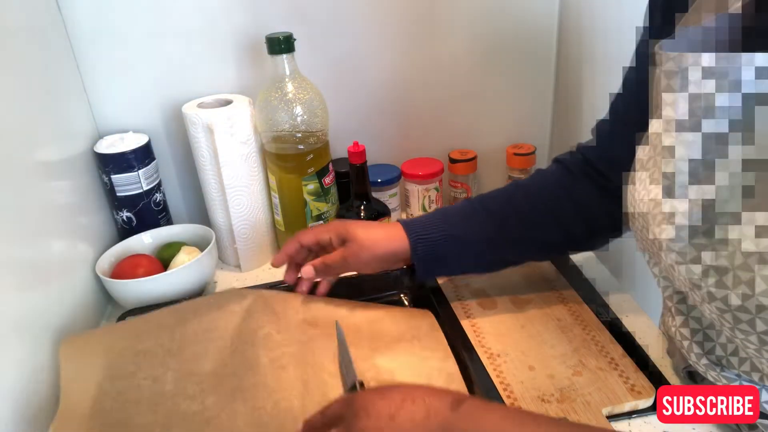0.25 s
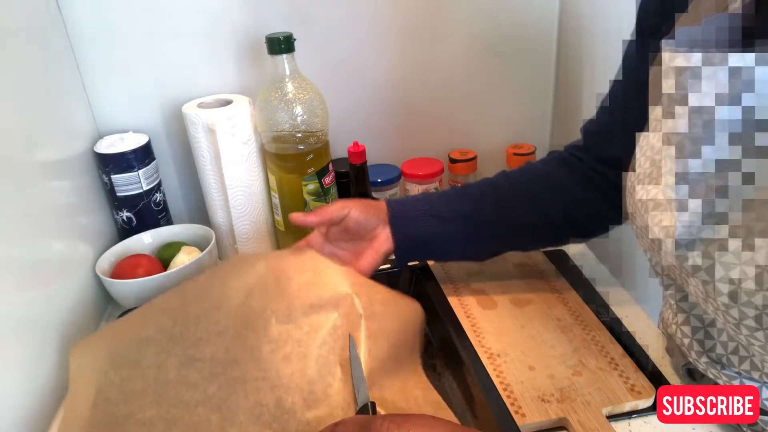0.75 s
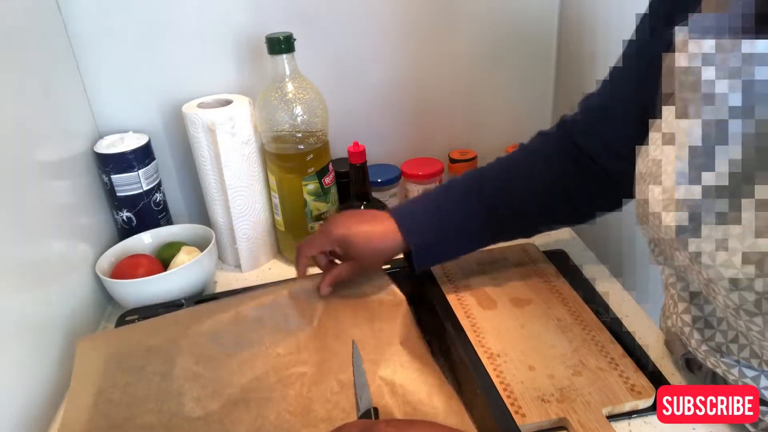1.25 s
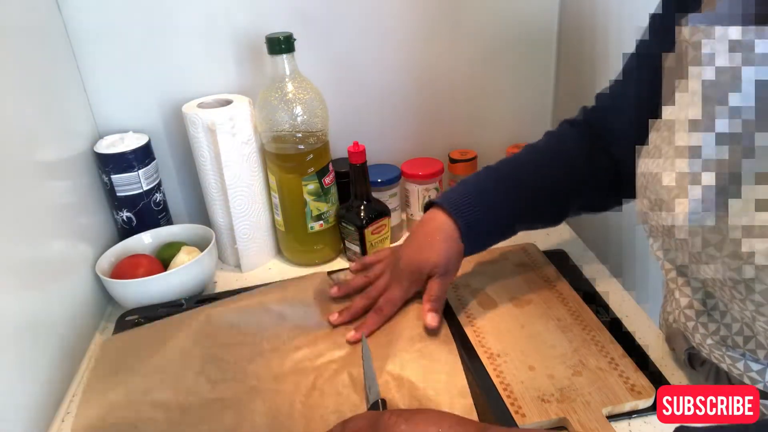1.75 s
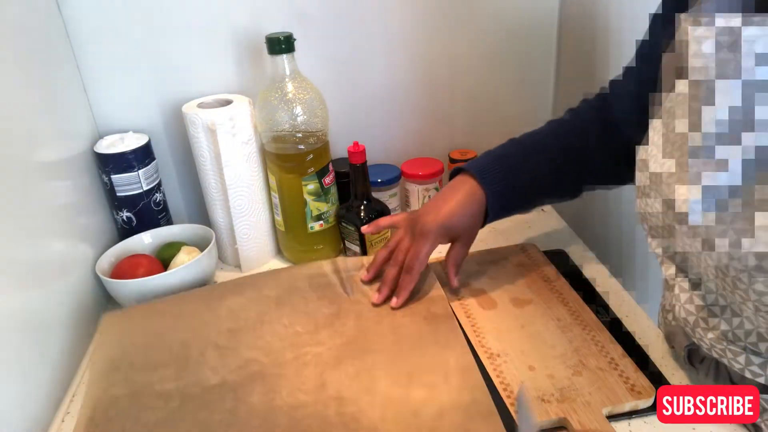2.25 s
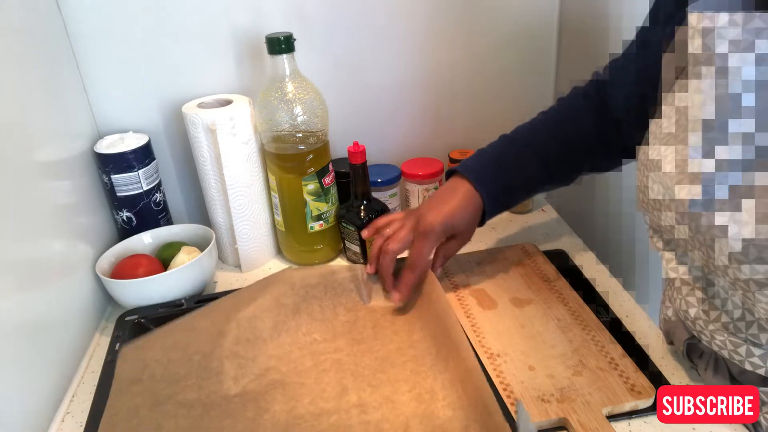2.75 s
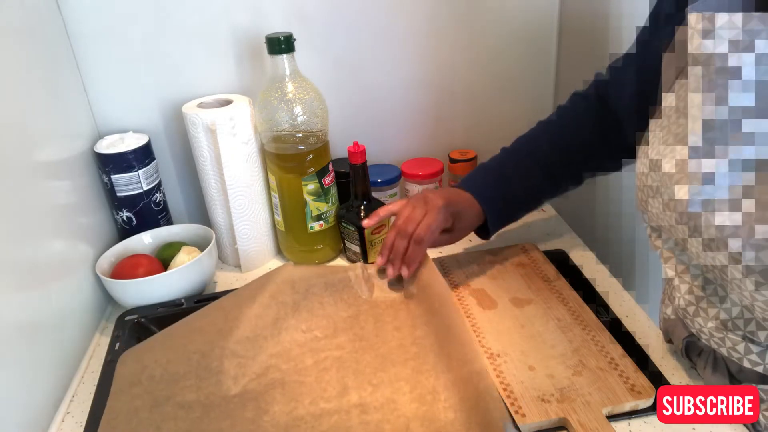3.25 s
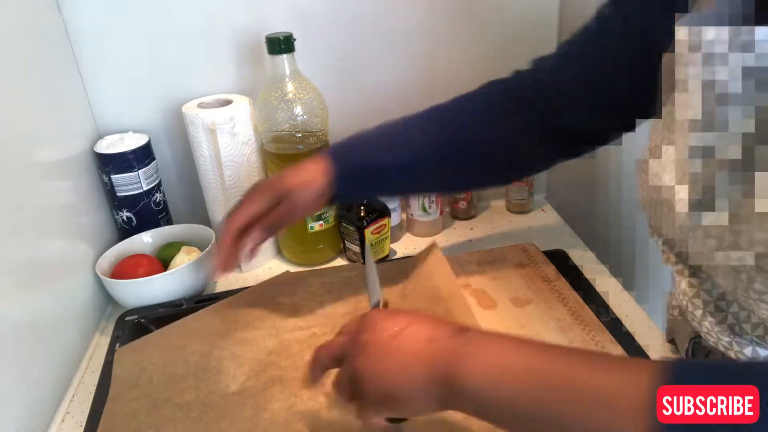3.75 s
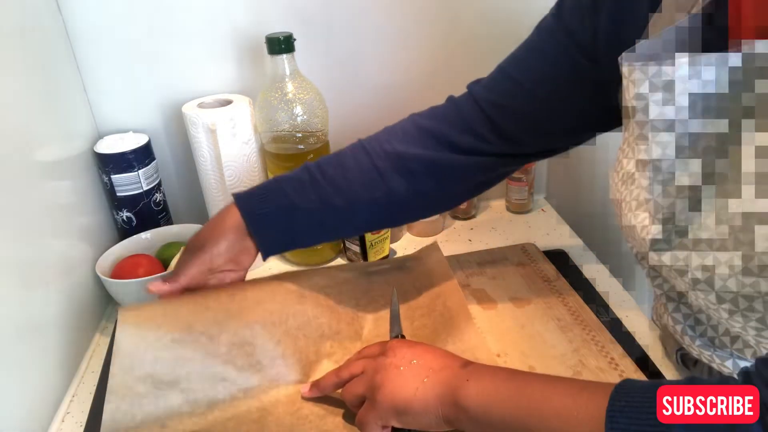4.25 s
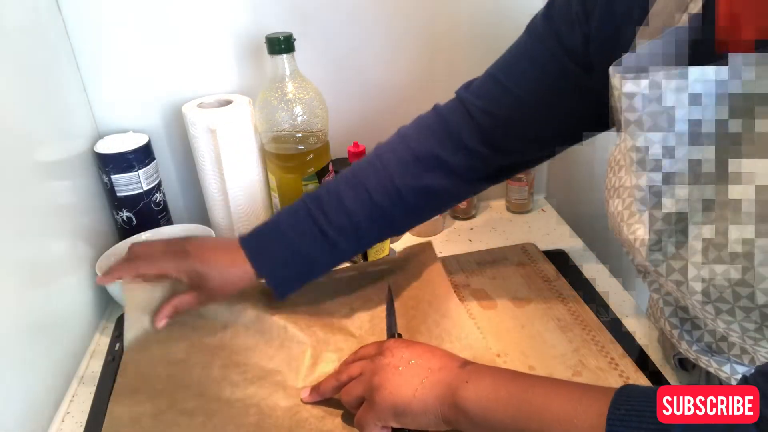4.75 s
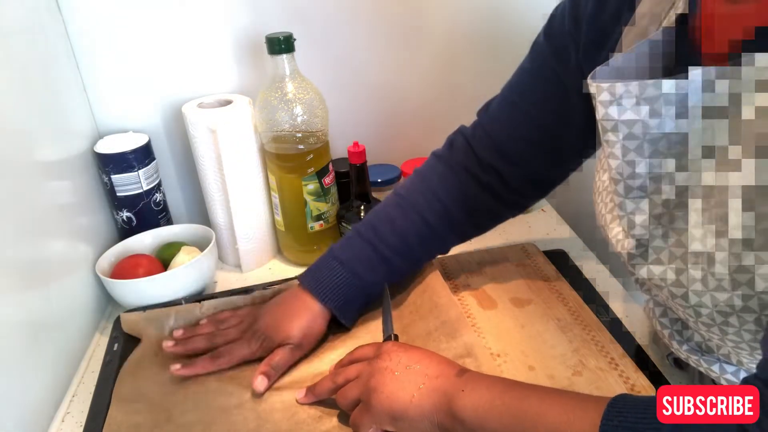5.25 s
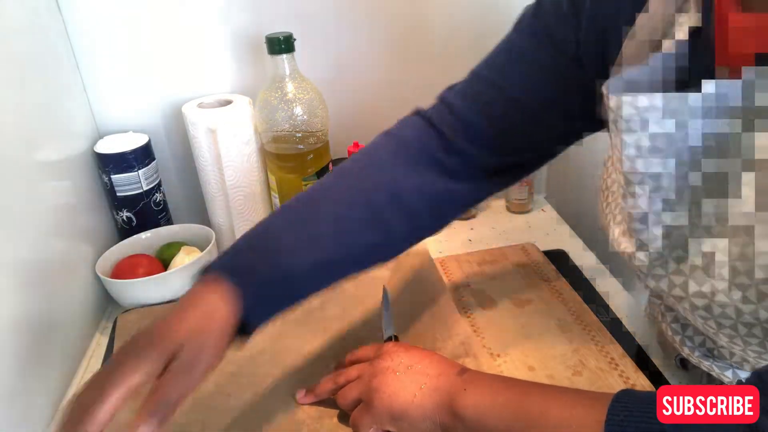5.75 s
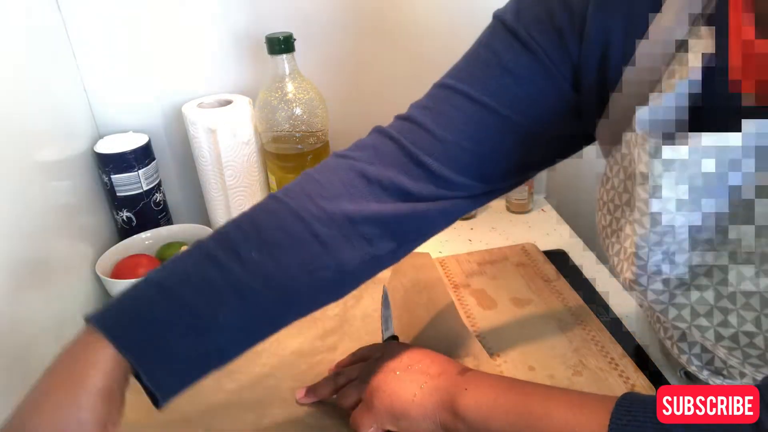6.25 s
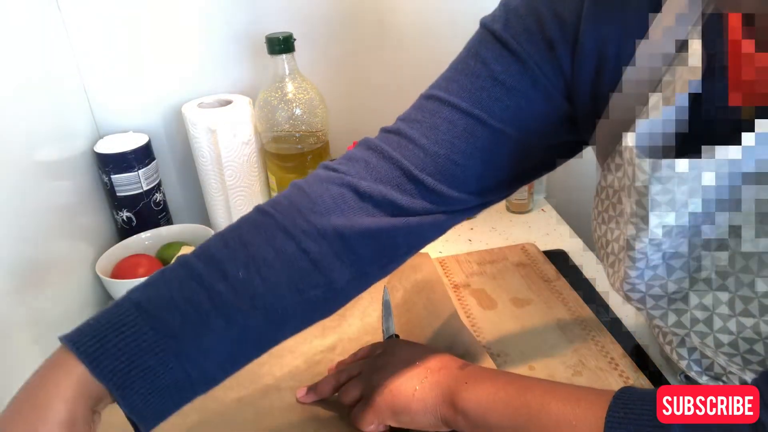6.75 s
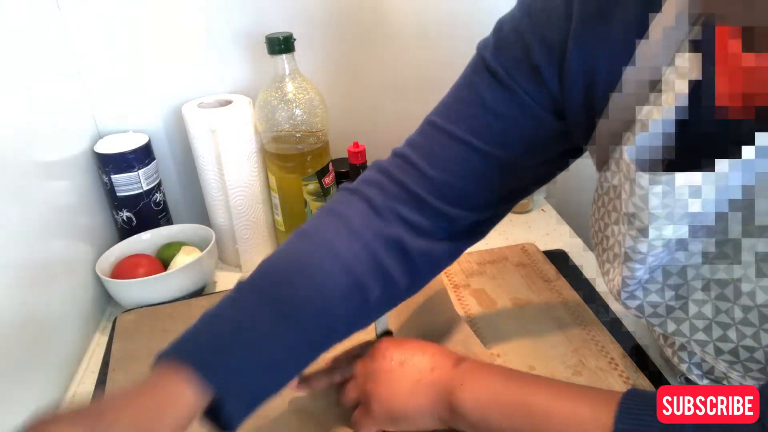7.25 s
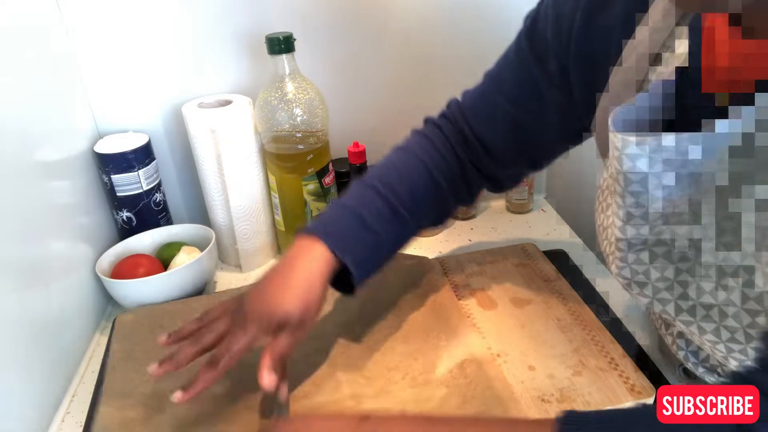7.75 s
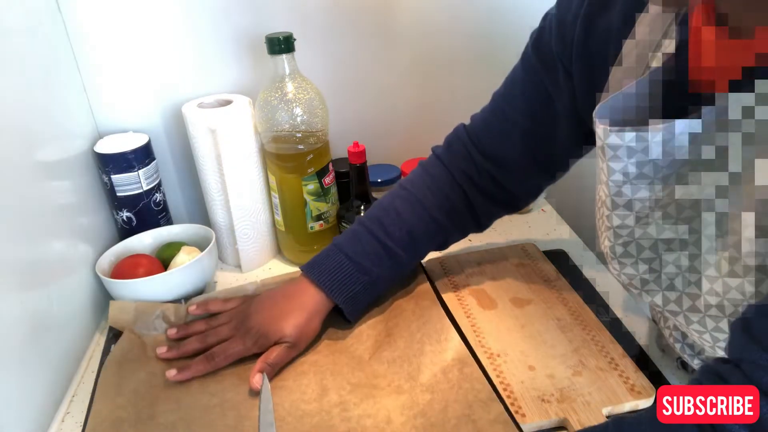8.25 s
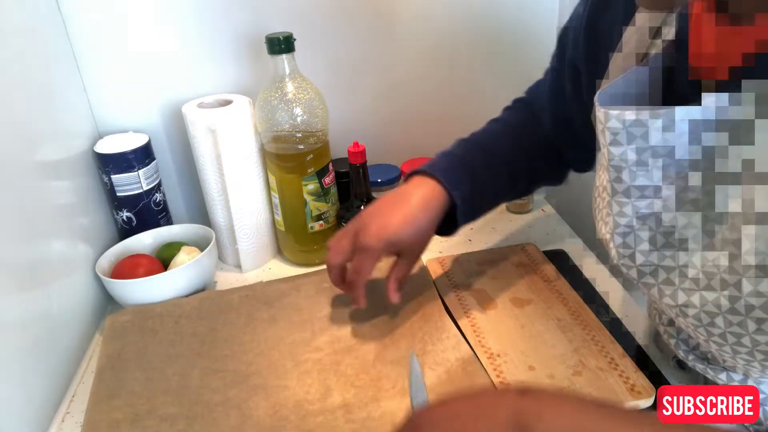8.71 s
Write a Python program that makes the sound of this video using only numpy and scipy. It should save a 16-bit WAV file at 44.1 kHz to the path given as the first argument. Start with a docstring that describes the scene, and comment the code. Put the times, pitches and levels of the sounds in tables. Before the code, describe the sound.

Baking paper crinkles and rustles in uneven bursts as hands spread and smooth it over a metal tray, with sharp creases snapping in a small kitchen.

```python
"""Rustling baking paper, spread and smoothed by hand over a metal tray in the corner of a small kitchen.
Sliding is random facet clicks plus friction noise, shaped stroke by stroke; creases snap as single
swelling ticks or collapse in quick runs of clicks. Now and then the palm pats the tray: decaying modes
boom softly under a puff of air. Some drags add a hollow gliding note of resonant noise.
Wall echoes and a short tail surround the paper; faint room air lies under it all. One close microphone."""
import sys
import numpy as np
from scipy import signal
from scipy.fft import rfft, irfft
from scipy.io import wavfile

SR = 44100
rng = np.random.default_rng(int(sys.argv[2]) if len(sys.argv) > 2 else 0)


def transcribe(u):
    """Save the signal u as a 16-bit wav file named by the first command-line argument.

    u: samples, shape (n,) or (channels, n), limited to [-1, 1]; the rate is SR.
    q: integer samples, one column per channel.
    """
    v = np.clip(np.atleast_2d(u).T, -1, 1)
    q = np.round(v * 32767).astype(np.int16)
    wavfile.write(sys.argv[1], SR, q)


N = 396018

# colour of the sheet: hz, density_db (relative, per Hz)
PAPER_COLOUR = [(35, -45.5), (65, -12), (130, -12), (220, -6), (340, -5.5), (480, -5), (800, -3.5),
                (1400, 0), (2600, 1), (4200, 0), (6000, -4.5), (7700, -7), (8400, -11.5), (16000, -23.5)]


def gain_of(db):
    """Decibels to an amplitude factor."""
    return 10 ** (np.asarray(db) / 20)


def evened(x):
    """Scales to rms 1."""
    return x / np.sqrt(np.mean(x ** 2) + 1e-20)


def read(points, hz):
    """Interpolates a table along a logarithmic frequency axis."""
    table_hz, value = np.transpose(points)
    return np.interp(np.log(hz + 1), np.log(table_hz + 1), value)


def add(mix, start_s, sound):
    """Mixes a sound in at start_s, cut at the end of the mix."""
    part = mix[max(round(start_s * SR), 0):][:len(sound)]
    part += sound[:len(part)]


def coloured(x, points, size=4096):
    """Causal minimum-phase filter with the given spectrum, so that clicks keep their sharp fronts."""
    hz = abs(np.fft.fftfreq(size, 1 / SR))
    log_gain = np.log(gain_of(read(points, hz)))
    taps = np.fft.ifft(np.exp(np.conj(signal.hilbert(log_gain)))).real
    # of the two time directions, keep the one with its energy up front
    both = taps, np.roll(taps[::-1], 1)
    taps = max(both, key=lambda h: np.sum(h[:size // 2] ** 2))[:size // 2]
    return signal.oaconvolve(x, taps / np.linalg.norm(taps))[:len(x)]


def tinted(x, crisp_db, body_db, treble_hz=6200, body_hz=1000):
    """Taut paper has more treble; paper pressed on the tray has more body."""
    hz = np.fft.rfftfreq(len(x), 1 / SR)
    spectrum = rfft(x)
    treble = irfft(spectrum * (1 - 1 / (1 + (hz / treble_hz) ** 4)), len(x))
    body = irfft(spectrum / (1 + (hz / body_hz) ** 4), len(x))
    return x + (gain_of(crisp_db) - 1) * treble + (gain_of(body_db) - 1) * body


def gliding(hz, width_hz):
    """Noise in a resonance that follows the curve hz."""
    noise = rng.standard_normal(len(hz)) + 1j * rng.standard_normal(len(hz))
    lowpass = signal.butter(2, width_hz / 2, fs=SR, output="sos")
    band = signal.sosfilt(lowpass, noise)
    carrier = np.exp(2j * np.pi * np.cumsum(hz) / SR)
    return evened((band * carrier).real)


def grip(length, uneven_db, slips_per_s):
    """Paper catches and lets go: a gain that wanders between slips at irregular moments."""
    slips_s = np.cumsum(rng.exponential(1 / slips_per_s, length))
    wander = np.interp(np.arange(length) / SR, slips_s, rng.uniform(-1.56, 1, length))
    return gain_of(uneven_db * wander)


def buckle(t60_s, crack=0.67, crack_s=0.00052, rise_s=0.00036, uneven_db=5.0, size=4096):
    """One facet flips: a crack, then bending waves scatter, coloured by the facet's own resonances."""
    t = np.arange(size) / SR
    decay = gain_of(-60 * t / t60_s) + crack * np.exp(-t / crack_s)
    shape = decay * (1 - np.exp(-t / rise_s))
    hz = np.geomspace(200, 16000, num=24)
    resonances = np.column_stack([hz, uneven_db * rng.uniform(-1.94, 1.82, len(hz))])
    wave = coloured(rng.standard_normal(size) * shape, resonances, size=1024)
    return wave / np.linalg.norm(wave)


def crackle(length, per_s, spread_db, t60_s, count=28):
    """Facets of count kinds flip at random, mostly small and a few large."""
    sizes = gain_of(spread_db * np.minimum(rng.exponential(1, length), 3.5))
    sizes = sizes * (rng.random(length) < per_s / SR)
    facet = rng.integers(0, count, length)
    return sum(signal.oaconvolve(sizes * (facet == k), buckle(t60_s)) for k in range(count))


def strokes(step=64):
    """Level, crispness and body of the sliding sheet in dB: pressure brightens it, strong strokes dominate."""
    # start_s, press_s, ease_s, level_db, crisp_db (extra treble), body_db (extra low-mid)
    hand_strokes = [(-0.04, 0.026, 0.021, -37.5, -2, 4), (0.115, 0.11, 0.052, -32, 3.5, -1),
                    (0.32, 0.076, .35, -38, 5.5, 2.5), (0.803, 0.014, 0.099, -36, 7, 1.5),
                    (0.924, 0.032, 0.027, -27, 3, -8.5), (1.0, .10, 0.25, -33.5, 4.5, 2),
                    (1.39, 0.026, 0.19, -50.5, 0, 1), (1.583, 0.013, 0.092, -28.5, 4.5, -1),
                    (1.74, 0.049, 0.051, -35, 5.5, 0), (1.87, 0.032, 0.14, -47, -6, -1),
                    (2.068, 0.11, .14, -34.5, 3.5, -2.5), (2.33, 0.037, 0.19, -36.5, 6.5, -3),
                    (2.503, 0.026, 0.097, -32.5, 5, 6), (2.67, 0.023, .27, -42.5, -2.5, 0.5),
                    (3.0, 0.057, 0.34, -45.5, -4, -5.5), (3.193, 0.051, 0.11, -38, 6, -1),
                    (3.42, .02, 0.7, -56, -9, 1.5), (3.785, 0.048, 0.45, -39, 0.5, 2.5),
                    (4.329, 0.06, 0.12, -41, 0, 1.5), (4.496, 0.074, 0.076, -32, 6.5, -1.5),
                    (4.6, 0.05, 0.26, -40, 12, 1), (5.029, 0.051, 0.09, -30.5, 12.5, 3),
                    (5.27, 0.27, 0.11, -43.5, 2.5, 0), (5.655, .05, 0.032, -42.5, -10, 5.5),
                    (5.894, .02, 0.073, -36.5, 8, 2), (6.03, .22, 0.4, -38, 7, -0.5),
                    (6.63, 0.17, .28, -36.5, 3.5, 0), (7.07, 0.018, 0.18, -50.5, -7, 0),
                    (7.689, .015, 0.15, -36, 2.5, -3.5), (7.88, 0.19, 0.062, -34, 9.5, 2.5),
                    (8.16, 0.088, 0.34, -46.5, 2.5, 3.5), (8.653, 0.13, 0.068, -35, 8.5, -2),
                    (8.87, 0.14, .05, -41, 6, 0.5)]
    # the hand catches the sheet, presses up to full level, eases off and lets go
    catch_s, catch_db, eased_db, release_s = 0.011, -6.5, -8, 0.32
    crisp_per_db = 0.67  # treble dB per dB of pressure
    settle_db = -69  # the sheet stirring by itself between strokes
    t = np.arange(0, N, step) / SR
    power, crisp, body = gain_of(settle_db) ** 2, 0, 0
    for start_s, press_s, ease_s, level_db, crisp_db, body_db in hand_strokes:
        stages_s = start_s + np.cumsum([0, catch_s, press_s, ease_s, release_s])
        pressure_db = np.interp(t, stages_s, [catch_db, catch_db, 0, eased_db, -60])
        contact = np.interp(t, stages_s[:2], [0, 1])
        share = (contact * gain_of(level_db + pressure_db)) ** 2
        power = power + share
        crisp = crisp + share * (crisp_db + crisp_per_db * pressure_db)
        body = body + share * body_db
    curves = 10 * np.log10(power), crisp / power, body / power
    return [np.interp(np.arange(N) / SR, t, curve) for curve in curves]


def rustle(crackle_db=-2.5, rub_db=-5.5, prickle_db=-11.5, prickle_hz=4500):
    """Sliding paper: clumped crackle and sparse pricks of the stiff coating over smoother friction hiss."""
    level_db, crisp_db, body_db = strokes()
    grains = crackle(N, per_s=520, spread_db=4.0, t60_s=0.036)[:N]
    grains = grains * grip(N, uneven_db=6.5, slips_per_s=70)
    grains = tinted(evened(coloured(grains, PAPER_COLOUR)), crisp_db=-1.5, body_db=1.0)
    pricks = coloured(crackle(N, per_s=45, spread_db=6.5, t60_s=0.005)[:N], PAPER_COLOUR)
    highpass = signal.butter(2, prickle_hz, "high", fs=SR, output="sos")
    pricks = evened(signal.sosfilt(highpass, pricks))
    rub = evened(coloured(rng.standard_normal(N), PAPER_COLOUR))
    rub = tinted(rub, crisp_db=-32, body_db=1.0)
    sheet = gain_of(crackle_db) * grains + gain_of(prickle_db) * pricks + gain_of(rub_db) * rub
    return gain_of(level_db) * tinted(sheet, crisp_db, body_db)


def room_air(level_db=-67.5):
    """Still kitchen air: steady coloured noise."""
    # hz, density_db (relative, per Hz)
    air_colour = [(15, -35), (25, -26.5), (64, 12), (206, 5.5), (309, -16.5), (607, 8), (1040, -29.5),
                  (2550, -34), (2990, -38), (3430, -56), (16000, -16)]
    return gain_of(level_db) * evened(coloured(rng.standard_normal(N), air_colour))


def snaps(spike_db=-15.5):
    """Single stiff creases flip: a fine spike, then a tick that swells as the kink runs along the fold."""
    # start_s, peak_db, crisp_db
    single_creases = [(0.1279, -27, -3), (0.26, -23.5, 7), (0.3286, -26, 4), (0.3563, -27, 5),
                      (0.464, -24, 9), (0.5222, -25.5, 2), (0.606, -27, -7), (0.665, -27.5, 1),
                      (0.823, -26, -1), (1.0917, -23, 17), (1.1933, -22.5, 10), (1.512, -37, -1),
                      (1.5628, -36, -6), (1.5962, -24, 7), (1.6546, -24.5, 9), (1.7515, -27.5, 10),
                      (1.9082, -30.5, -10), (2.045, -36, -8), (2.1146, -24.5, 2), (2.149, -26, 10),
                      (2.272, -23.5, 5), (2.358, -26, 0), (2.438, -36, 6), (2.4724, -26, 13),
                      (2.6604, -21, 9), (2.7004, -22.5, 8.5), (2.9343, -30, 4), (2.966, -41, -11),
                      (3.05, -27.5, 5.5), (3.121, -30, 1), (3.239, -19.5, -0.5), (3.324, -26, 10),
                      (3.6511, -39, -20), (3.733, -38.5, -25), (4.0732, -31, -10), (4.128, -23, 5.5),
                      (4.175, -31.5, 6), (4.2569, -30.5, 2), (4.3929, -24, 1), (4.8902, -36, 21),
                      (5.007, -31.5, 2), (5.0437, -28, -1), (5.312, -38, -15), (5.6303, -32, 4),
                      (5.7531, -37.5, -7), (5.904, -24, 12), (5.964, -24.5, 3), (6.0207, -22.5, -1),
                      (6.0924, -27.5, 17), (6.4458, -26.5, 9), (6.6228, -21.5, 11.5), (6.6646, -23, 12),
                      (6.9057, -22.5, 5), (7.0316, -28.5, 5), (7.1753, -33.5, -3), (7.249, -36.5, 2),
                      (7.39, -51.5, -14), (7.464, -52, -15), (7.618, -49, -18), (7.6934, -31, -5),
                      (7.7898, -20, 3), (8.2608, -27.5, 6), (8.3842, -26.5, 0), (8.532, -35, -10),
                      (8.6678, -27.5, 3), (8.9448, -23.5, 12)]
    out = np.zeros(N)
    for start_s, peak_db, crisp_db in single_creases:
        flip = buckle(t60_s=0.045, crack=3.9, crack_s=0.0037, rise_s=0.0029, uneven_db=3.0)
        spike = np.diff(buckle(t60_s=0.005), prepend=0)  # differencing favours treble
        tick = coloured(flip + gain_of(spike_db) * spike, PAPER_COLOUR)
        tick = tinted(tick, crisp_db, body_db=-5)
        peak = np.sort(abs(tick))[-10:].mean()
        add(out, start_s, gain_of(peak_db) * tick / peak)
    return out


def crumples():
    """A fold collapses as a short, dense avalanche of buckles."""
    # start_s, length_s, level_db (before the tint), crisp_db
    crease_runs = [(0.131, 0.032, -36.5, 4.5), (0.208, 0.029, -30.5, 3.5), (0.405, 0.041, -39, 8),
                   (0.944, 0.052, -33, 13.5), (1.038, 0.03, -35.5, 3), (1.602, 0.018, -29.5, 10.5),
                   (1.784, 0.027, -39, 9), (2.156, 0.043, -40.5, 4), (2.179, 0.01, -28, 9),
                   (2.516, 0.061, -29.5, -21), (3.257, 0.066, -48, -14), (3.79, 0.014, -33.5, 3.5),
                   (3.834, 0.026, -36, 3.5), (4.549, 0.029, -32.5, 11.5), (4.67, 0.015, -33, 9.5),
                   (5.068, 0.05, -30.5, -3), (5.923, 0.016, -37, 5), (6.224, 0.03, -35, 10.5),
                   (6.275, 0.033, -35.5, 8.5), (6.769, 0.019, -34.5, 9.5), (7.702, 0.028, -37, 10),
                   (8.053, 0.025, -55, 1), (8.73, 0.026, -35, 7.5), (8.797, 0.024, -37.5, 13.5)]
    out = np.zeros(N)
    for start_s, length_s, level_db, crisp_db in crease_runs:
        n = int(length_s * SR)
        run = crackle(n, per_s=2600, spread_db=0.0, t60_s=0.021, count=16)
        run = coloured(run, PAPER_COLOUR)
        run = run * np.sqrt(n) / np.linalg.norm(run)
        add(out, start_s, gain_of(level_db) * tinted(run, crisp_db, body_db=-3))
    return out


def pats(rise_s=0.009, puff_db=-4, puff_s=0.0287):
    """The soft palm sets the tray booming and squeezes out a puff of air, falling in pitch."""
    # start_s, peak_db
    palm_pats = [(1.2, -34), (2.54, -38.5), (3.273, -34), (3.84, -38), (4.835, -49), (5.083, -29),
                 (8.034, -35.5), (8.751, -42.5)]
    # modes of the tray on the worktop: mode_hz, mode_db, t60_s
    tray_modes = [(63, -11.5, .42), (95, 2.5, 0.32), (137.3, -0.5, 0.14), (221, -12, 0.21),
                  (259, -16, 0.077)]
    out, t = np.zeros(N), np.arange(SR) / SR
    gap = np.exp(-t / puff_s)  # the air pocket closes
    for start_s, peak_db in palm_pats:
        boom = 0
        for mode_hz, mode_db, t60_s in tray_modes:
            phase = 2 * np.pi * (mode_hz * t + rng.random())
            boom = boom + gain_of(mode_db - 60 * t / t60_s) * np.sin(phase)
        puff = gliding(110 + 200 * gap, width_hz=74) * gap
        pat = boom * (1 - gap) + gain_of(puff_db) * puff
        pat = pat * (1 - np.exp(-(t / rise_s) ** 2))
        add(out, start_s, gain_of(peak_db) * pat / abs(pat).max())
    return out


def drags():
    """Uneven friction excites a broad resonance of the pressed sheet, which glides as the hand travels."""
    # start_s, end_s, start_hz, end_hz, width_hz, level_db (before the fades)
    rubbing_notes = [(3.855, 4.064, 2370, 2040, 700, -47), (4.575, 4.878, 390, 326, 140, -55.5),
                     (5.958, 6.513, 659.4, 646.4, 200, -50.5), (8.395, 8.719, 2270, 1950, 150, -59)]
    out = np.zeros(N)
    for start_s, end_s, start_hz, end_hz, width_hz, level_db in rubbing_notes:
        n = int((end_s - start_s) * SR)
        note = gliding(np.linspace(start_hz, end_hz, n), width_hz)
        note = evened(note * grip(n, uneven_db=4.0, slips_per_s=26))
        add(out, start_s, gain_of(level_db) * note * signal.windows.tukey(n, 0.5))
    return out


def echoes(walls_db=-9, tail_db=-11, build_s=0.015, count=14, size=16384):
    """The corner walls answer within milliseconds; the room follows with a short tail."""
    # reverberation of the kitchen: hz, t60_s
    kitchen_decay = [(150, 0.87), (1000, 0.7), (4000, 0.38), (14000, 0.48)]
    walls = np.zeros(size)
    delays = (rng.uniform(0.002, 0.016, count) * SR).astype(int)
    walls[delays] = rng.choice([-1, 1], count) / np.sqrt(count)
    hz, t, spectrum = signal.stft(rng.standard_normal(size), SR, nperseg=256)
    decay = gain_of(-60 * t / read(kitchen_decay, hz)[:, None]) * (1 - np.exp(-t / build_s))
    tail = signal.istft(spectrum * decay, SR, nperseg=256)[1][:size]
    return gain_of(walls_db) * walls + gain_of(tail_db) * tail / np.linalg.norm(tail)


def kitchen(x, size=8192):
    """The crackling spot wanders over the sheet, so each moment meets another pattern of echoes."""
    out, padded = x.copy(), np.pad(x, (0, size))
    for i in range(0, N, size // 2):
        block = padded[i:i + size] * signal.windows.cosine(size)
        add(out, i / SR, signal.fftconvolve(block, echoes()))
    return out


def scene():
    """Paper with its echoes, dry tray pats and the quiet of the room."""
    paper = rustle() + snaps() + crumples() + drags()
    return (kitchen(paper) + room_air() + pats())[None]


def record(dry, edge_hz=16150):
    """The microphone sheds the deepest bass; then the recorder's band limit."""
    dry = signal.sosfilt(signal.butter(3, 42, "high", fs=SR, output="sos"), dry)
    lowpass = signal.firwin(511, edge_hz, window=("kaiser", 9), fs=SR)
    return signal.oaconvolve(dry, lowpass[None], "same")


dry = scene()
out = record(dry)
transcribe(out)
```